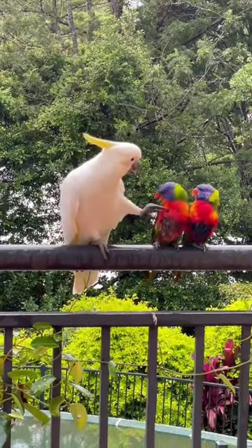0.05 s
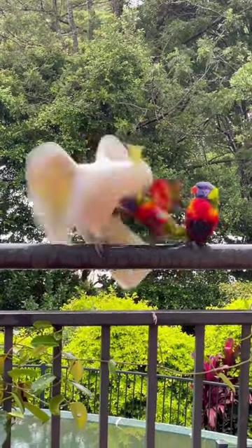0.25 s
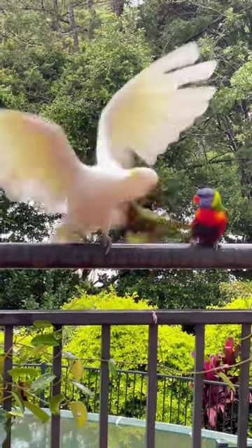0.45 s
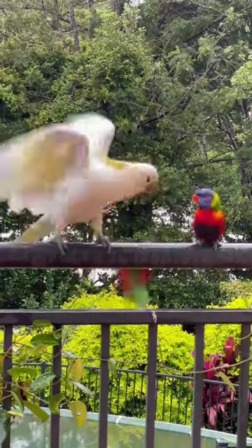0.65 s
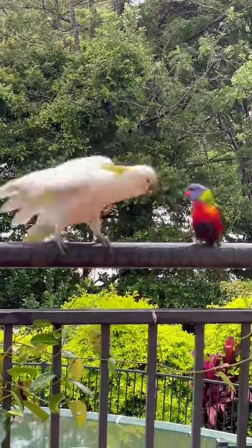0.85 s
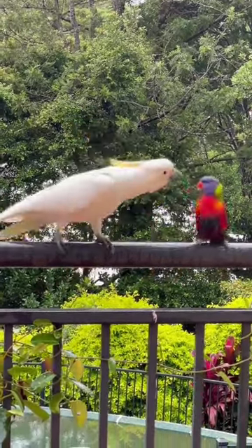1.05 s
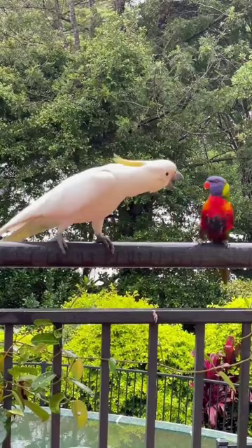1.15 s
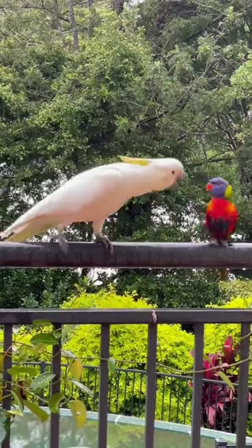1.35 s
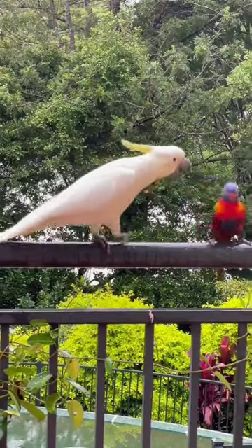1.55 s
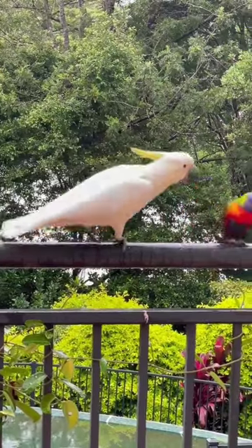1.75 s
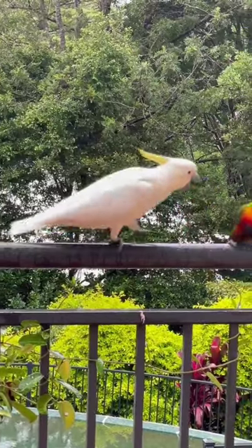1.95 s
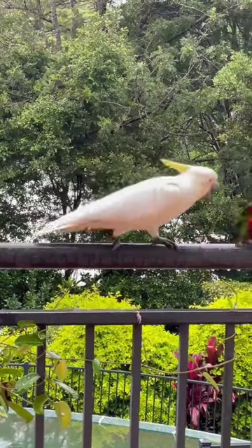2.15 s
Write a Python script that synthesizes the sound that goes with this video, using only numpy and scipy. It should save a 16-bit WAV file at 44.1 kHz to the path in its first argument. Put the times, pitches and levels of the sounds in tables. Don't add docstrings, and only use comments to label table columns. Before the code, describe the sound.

A parrot screeches once, harsh, loud and close, from 0.2 to 0.4 seconds, snapping open then brightening, with quick balcony reflections and a faint garden echo. Feather slaps and rapid wingbeats follow from 0.5 to 1.1. Claws tick and scrape on a ringing steel rail, clearest near 1.0 and 2.0. A faint distant bird whistles from 1.2 to 2.0 over low hum, traffic rumble and breezy leaves.

```python
import sys
import numpy as np
from scipy import signal
from scipy.fft import rfft, irfft, next_fast_len
from scipy.io import wavfile
from scipy.ndimage import uniform_filter1d, map_coordinates

SR = 44100
rng = np.random.default_rng(int(sys.argv[2]) if len(sys.argv) > 2 else 0)


def gain_from_db(level_db):
    decades = np.asarray(level_db, float) / 20
    return 10 ** decades


def wav_record(signal):
    frames = np.transpose(np.atleast_2d(signal))
    bounded = np.clip(frames, -1, 1)
    quanta = np.round(bounded * 32767).astype(np.int16)
    wavfile.write(sys.argv[1], SR, quanta)


N = 97020
T = np.arange(N) / SR
PORTS = np.array([[0.5], [-0.5]])


def unit(x):
    return x / np.sqrt(np.mean(x ** 2) + 1e-20)


def along(points, hz):
    f, v = np.transpose(points)
    return np.interp(np.log(hz + 1), np.log(f + 1), v)


def curves(rows):
    s, *cols = np.transpose(rows)
    return [np.interp(T, s, c) for c in cols]


def wobble(rate):
    return map_coordinates(rng.standard_normal(int(N * rate / SR) + 4), [T * rate])


def filtered(x, response):
    m = next_fast_len(N + SR // 10)
    return irfft(rfft(x, m) * response(np.fft.rfftfreq(m, 1 / SR)), m)[..., :N]


# (frequency [Hz], left-right likeness [0-1])
LIKENESS = [(20, 1), (110, 0.99), (170, 1), (350, 0.84), (1200, 0.596), (2500, 1), (6500, 0.11),
            (11000, 0.31)]


def spread(pair, spectrum):
    def weights(hz):
        turn = np.arccos(np.clip(along(LIKENESS, hz), -1, 1)) / 2
        return gain_from_db(along(spectrum, hz)) * [np.cos(turn), np.sin(turn)]
    mid, side = filtered(pair, weights)
    return np.array([mid + side, mid - side])


def rush(spectrum):
    z = signal.stft(rng.standard_normal((2, N)), nperseg=512)[2]
    field = uniform_filter1d(rng.standard_normal(z.shape[1:]), size=7, axis=0)
    field = uniform_filter1d(field, size=9, axis=1)
    patchy_db = 2 * unit(field)
    noise = signal.istft(z * gain_from_db(patchy_db), nperseg=512)[1][:, :N]
    return unit(spread(noise, spectrum))


# (frequency [Hz], level [dB])
RAIL_LEAN = [(60, 2.5), (110, -2), (200, 3), (360, -0.5), (650, 7.5), (1180, 6.5), (2130, -1), (3870, 0.5),
             (7010, 1), (12700, 1.5)]
# (frequency [Hz], phase [rad])
RAIL_LEAD = [(100, -0.5), (780, .8), (3800, 0.065), (4800, 0.95), (5400, 0.2), (7500, 1), (9300, 1),
             (12500, 0.5)]


def placed(x):
    return filtered(x, lambda hz: (gain_from_db(along(RAIL_LEAN, hz)) * np.exp(1j * along(RAIL_LEAD, hz))) ** PORTS)


# (frequency [Hz], density [dB per Hz])
TRAFFIC = [(15, -50.5), (33, -25.5), (55, 0.5), (90, -9), (140, -5.5), (200, -9.5), (400, -45)]
# (frequency [Hz], density [dB per Hz])
LEAVES = [(120, -3), (250, 1.5), (550, -8), (1200, -9), (2200, -21), (7000, -29.5), (10300, -24),
          (13200, -31.5)]
# (time [s], level [dB])
GUST = [
    (0, 1.5),
    (.6, 11),
    (1, 5.5),
    (1.5, 0),
    (2.2, 0.5),
]
# (time [s], level [dB])
DUCK = [
    (0, -3),
    (.2, -2),
    (.26, -3),
    (.45, -13),
    (.58, -3.5),
    (.9, -1.5),
    (2.2, 0),
]
# (frequency [Hz], level [dB])
AMBIENCE_LEAN = [(110, 0), (250, 1.5), (700, 2), (2000, 1), (10000, 0)]


def ambience():
    gust_db, = curves(GUST)
    duck_db, = curves(DUCK)
    hum_hz, hum_db, traffic_db, leaves_db = 172.3, -52, -55.5, -58.5
    hum = gain_from_db(hum_db + 3 + 1.3 * wobble(12)) * np.sin(2 * np.pi * hum_hz * T + 0.3 * wobble(10))
    traffic = gain_from_db(traffic_db - 1 + 0.5 * gust_db + 0.8 * wobble(9.9)) * rush(TRAFFIC)
    leaves = gain_from_db(leaves_db + gust_db + 0.46 * wobble(26) + 1.8 * wobble(40)) * rush(LEAVES)
    return gain_from_db(duck_db) * filtered(hum + traffic + leaves, lambda hz: gain_from_db(along(AMBIENCE_LEAN, hz)) ** PORTS)


# (time [s], length [s], start [Hz], end [Hz], level [dB])
WHISTLES = [(1.22, .41, 735, 785, -73), (1.25, .38, 1475, 1575, -67), (1.58, .12, 1290, 1230, -68),
            (1.72, .09, 1150, 1100, -69), (1.77, .07, 2020, 1980, -71), (1.7, .17, 2700, 2900, -74),
            (1.6, .08, 2850, 2900, -76), (1.53, .07, 2560, 2640, -78), (1.59, .11, 5500, 5750, -81),
            (1.9, .08, 4020, 4080, -78), (1.63, .06, 2300, 2320, -77), (1.19, .09, 3200, 3150, -77)]


def whistles():
    out = np.zeros(N)
    waver_db, waver = 2 * wobble(30), 0.013 * wobble(50)
    for s, length, start_hz, end_hz, db in WHISTLES:
        u = np.clip((T - s) / length, 0, 1)
        hz = start_hz + (end_hz - start_hz) * u + start_hz * waver
        swell = np.sqrt(np.sin(np.pi * u) + 1e-12)
        out += gain_from_db(db + waver_db) * swell * np.sin(2 * np.pi * np.cumsum(hz) / SR)
    return out


# (time [s], push [dB], feather swish [dB])
BEATS = [
    (0.518, -61, -52),
    (0.578, -46.5, -51.5),
    (0.653, -41.5, -43),
    (0.719, -44, -44),
    (.782, -45.5, -45.5),
    (0.851, -53.5, -56),
    (0.921, -45.5, -58),
    (.99, -46.5, -56.5),
    (1.053, -49, -57.5),
]
# (frequency [Hz], density [dB per Hz])
FEATHERS = [(120, -49), (200, -10.5), (348, -5), (627, -6.5), (886, -12), (5640, -31.5), (9150, -32),
            (10200, -20), (12500, -36.5), (16200, -69), (22000, -120)]
# (time [s], peak [dB], pitch [Hz])
CLAPS = [(0.21, -46.5, 349.2), (0.384, -40, 281), (0.403, -43, 450), (.514, -40.5, 438), (.596, -39, 607),
         (.626, -33.5, 503), (.6455, -29, 478), (.654, -28.5, 650), (.660, -32.5, 700), (.691, -28, 562),
         (0.714, -45, 1520), (0.723, -40.5, 884), (.755, -38, 760), (0.784, -32.5, 890),
         (.786, -43.5, 1393), (0.817, -42, 501), (.82, -49.5, 1186), (.85, -36.5, 868), (0.85, -42.5, 1420),
         (.961, -41.5, 750), (1.103, -41, 527)]


def wings():
    push_hz, push_s = 62.4, 0.0087
    swish_s, upstroke_s, upstroke_db = 0.012, 0.036, -5
    clap_t60, clap_rise_s = 0.028, 0.0022

    def bell(s, width):
        return np.exp(-0.5 * ((T - s) / width) ** 2)

    push, strokes, claps = np.zeros((3, N))
    for s, push_db, swish_db in BEATS:
        push += gain_from_db(push_db) * bell(s, push_s) * np.cos(2 * np.pi * push_hz * (T - s))
        strokes += gain_from_db(swish_db) * (bell(s, swish_s) + gain_from_db(upstroke_db) * bell(s + upstroke_s, swish_s))
    blur = 0.56 * wobble(140)
    for s, db, hz in CLAPS:
        after = np.clip(T - s, 0, None)
        envelope = gain_from_db(db - 60 * after / clap_t60) * (1 - np.exp(-after / clap_rise_s))
        claps += envelope * np.sin(2 * np.pi * hz * after + blur)
    swish = strokes * gain_from_db(-3 + 2.8 * wobble(120)) * rush(FEATHERS)
    return 1.36 * push + swish + placed(claps)


# (time [s], peak [dB], scrape share [0-1])
CLAWS = [(0.1668, -55.5, 0.44), (1.0255, -41.5, 0.5), (1.106, -55, 0.8), (1.3523, -53.5, 0.44),
         (1.4622, -62, 0.15), (1.7585, -47, 0.44), (1.8597, -45.5, 0.79), (1.9525, -60.5, 0.439),
         (1.9911, -34.5, 0.43), (2.058, -48.5, 0.92), (2.1107, -55, 0.69), (2.155, -48, 0.85)]
# (frequency [Hz], level [dB], t60 [s])
RAIL = [(1110, -15.5, 0.45), (1428.4, -15.5, 0.22), (3526, -17, 0.082), (4115, -6, 0.09), (4320, -4, 0.1),
        (5400, -10.5, 0.093), (6020, -11.5, 0.051), (7794, -3, 0.11), (7990, 4.5, 0.068),
        (10500, -14, 0.069), (11460, -8.5, 0.043)]
# (frequency [Hz], density [dB per Hz])
SCRAPE = [(2500, -43), (4000, -4.5), (6000, -7), (8800, -14.5), (10300, 3), (13000, -11)]


def claws():
    mode_blur, scrape_t60, rise_s = 0.056, 0.12, 0.0015
    out, t = np.zeros((2, N + SR)), T[:SR // 5]
    grit = rush(SCRAPE)
    hz, level, t60 = np.transpose(RAIL)[:, :, None]
    for s, db, share in CLAWS:
        i, share = round(s * SR), np.clip(share, 0, 1)
        drift = np.cumsum(rng.normal(0, mode_blur, (len(RAIL), len(t))), axis=1)
        struck_db = level + rng.normal(0, 3.2, level.shape)
        ring = np.sum(gain_from_db(struck_db - 60 * t / t60) * np.sin(2 * np.pi * hz * t + drift), axis=0)
        scrape = gain_from_db(-60 * t / scrape_t60) * np.roll(grit, -i, axis=1)[:, :len(t)]
        contact = (1 - share) * ring + share * scrape
        out[:, i:i + len(t)] += gain_from_db(db - 6) * (1 - np.exp(-t / rise_s)) * contact
    return out[:, :N]


def echo(x, decay, delay_s):
    hz, t, z = signal.stft(rng.standard_normal((2, SR)), SR, nperseg=256)
    z = z * gain_from_db(-60 * t / along(decay, hz)[:, None])
    tail = spread(signal.istft(z, SR, nperseg=256)[1][:, :N], [(100, 0)])
    tail = tail / np.linalg.norm(tail[0])
    delayed = np.pad(x, (round(delay_s * SR), 0))[None]
    return signal.fftconvolve(delayed, tail, axes=1)[:, :N]


# (frequency [Hz], t60 [s])
BALCONY = [(500, 0.15), (3000, 0.15), (11000, 0.025)]
# (frequency [Hz], level [dB])
BALCONY_TILT = [(1000, -9), (4000, 0), (10000, 5)]
# (frequency [Hz], t60 [s])
HOUSE = [(500, 0.19), (2500, 0.024), (11000, 0.3)]
# (frequency [Hz], t60 [s])
GARDEN = [(500, .3), (1200, 0.62), (2500, 0.98), (6000, 1), (11000, 1)]


def surroundings(voice):
    house_m = 34
    toward_walls = filtered(voice, lambda hz: gain_from_db(along(BALCONY_TILT, hz)))
    balcony = gain_from_db(-6) * echo(toward_walls, BALCONY, 0.0046)
    house = gain_from_db(-28) * echo(voice, HOUSE, 2 * house_m / 343)
    garden = gain_from_db(-26) * echo(voice, GARDEN, 0.11)
    return balcony + house + garden


# (frequency [Hz], level [dB])
SCATTER = [(400, -14), (900, -11.5), (2500, -14.5), (5000, -5.5), (8500, -1), (12500, -1.5)]


def scattered(x):
    t = T[:SR // 20]
    burst = rng.standard_normal(len(t)) * np.exp(-t / 0.012)
    side = signal.fftconvolve(x, burst / np.linalg.norm(burst))[:N]
    return filtered(side, lambda hz: gain_from_db(along(SCATTER, hz))) * np.array([[1], [-1]])


def tract(peaks):
    cut_hz = 420

    def response(f):
        jf = 1j * f
        low_cut = (jf / (0.81 * cut_hz + jf + cut_hz ** 2 / (jf + 1))) ** 2
        total = 0
        for k, (centre, width, db) in enumerate(peaks):
            total = total + (-1) ** k * gain_from_db(db) * jf * width / (centre * centre - f * f + jf * width)
        return low_cut * total
    return response


# (time [s], slow beat [Hz], level [dB], beak [0 dark, 1 bright, 2 closing], roughness [0-1])
SCREECH = [
    (.21, 265.7, -42.5, 1.93, 0.81),
    (.223, 261.8, -22.5, 2.15, 0.53),
    (.2365, 254.6, -19, 1.7, 0.58),
    (.2385, 252.7, -14, 0, 0.54),
    (.258, 250, -12.5, 0, 0.41),
    (.287, 242.4, -19.5, 1.6, .28),
    (.325, 242.3, -16.5, 1.01, 0.4),
    (.352, 253.4, -19, 2.1, .55),
    (.405, 262.2, -45, 1.3, 0.7),
]
# (time [s], peak [dB])
SNAPS = [
    (.2226, -15),
    (.2378, -3.5),
    (.2478, -8),
    (.2538, -6),
    (.2718, -6),
    (.3068, -12),
    (.3475, -12),
]
# (frequency [Hz], width [Hz], level [dB])
THROAT_DARK = [(320, 250, -24.5), (700, 200, -15.5), (1110, 400, -13.5), (1681, 230, -5), (2121, 460, -3.5),
               (3020, 370, -3), (3900, 790, -13), (6040, 1500, -23.5), (7680, 640, -20), (11000, 1600, -23)]
# (frequency [Hz], width [Hz], level [dB])
THROAT_BRIGHT = [(750, 100, -4.5), (1020, 250, -13.5), (1720, 280, -6.5), (2290, 500, 0), (3210, 360, -3.5),
                 (4050, 400, -2), (5630, 1100, -1), (5950, 500, -0.5), (6630, 350, -5.5),
                 (10900, 1400, -13)]
# (frequency [Hz], width [Hz], level [dB])
THROAT_CLOSING = [(760, 84, -8.5), (1230, 630, -6.5), (1717, 390, -7.5), (2110, 190, 1), (3100, 340, 0),
                  (3720, 400, -4.5), (5120, 900, -10.5), (5900, 380, -9), (6900, 500, -17.5),
                  (10500, 2600, -20)]


def screech():
    pulses_per_beat, scatter_db = 4, 2.5
    beat_hz, level_db, beak, rough = curves(SCREECH)
    rough, beak = np.clip(rough, 0, 1), np.clip(beak, 0, 2)
    beat = np.cumsum(beat_hz) / SR + 0.3 * rough ** 2 * wobble(70)
    jitter = 0.03 * pulses_per_beat * rough * wobble(700)
    pull = 0.2 * (0.35 + 0.65 * np.minimum(beak, 1)) * np.sin(2 * np.pi * beat)
    cycle = pulses_per_beat * beat + jitter + pull
    swell = 1 + 0.45 * np.cos(2 * np.pi * beat)

    starts = np.diff(np.floor(cycle), prepend=0) > 0
    late = np.clip(cycle % 1 / np.abs(np.gradient(cycle)), 0, 1)
    pulses = starts * (1 - late) + np.roll(starts * late, -1)
    pulses = pulses * swell * gain_from_db(2 * rough * scatter_db * wobble(600))
    air = swell * (1 - cycle % 1) ** 2 * gain_from_db(scatter_db * wobble(250)) * rng.standard_normal(N)
    source = 0.36 * 2 * rough * unit(air) - unit(pulses)

    voice = np.zeros(N)
    for k, throat in enumerate([THROAT_DARK, THROAT_BRIGHT, THROAT_CLOSING]):
        share = np.sqrt(np.clip(1 - np.abs(beak - k), 0, 1))
        voice += share * unit(filtered(source, tract(throat)))
    opening = np.clip((T - SCREECH[0][0]) / 0.004, 0, 1)
    closing = np.clip((SCREECH[-1][0] + 0.005 - T) / 0.005, 0, 1)

    snaps = np.zeros(N)
    for s, db in SNAPS:
        snaps[round(s * SR)] = -gain_from_db(db)
    snaps = filtered(snaps, tract(THROAT_DARK))
    snaps = snaps * gain_from_db(max(db for _, db in SNAPS)) / np.abs(snaps).max()
    return voice * gain_from_db(level_db) * opening * closing + snaps


def scene():
    background = ambience() + whistles()
    voice = screech()
    return background + wings() + claws() + surroundings(voice) + scattered(voice) + placed(voice)


def top_cut(x):
    return signal.sosfilt(signal.butter(12, 13320, fs=SR, output="sos"), x)


def record(dry):
    top, top_hz = 1.1, 13150
    limited = dry / (1 + np.abs(dry / top) ** 4) ** (1 / 4)
    held = filtered(limited, lambda hz: hz < top_hz)
    return top_cut(held)


dry = scene()
out = record(dry)
wav_record(out)
```